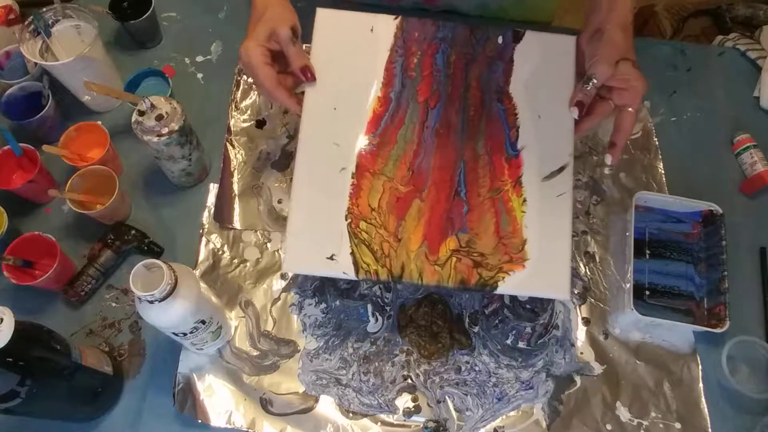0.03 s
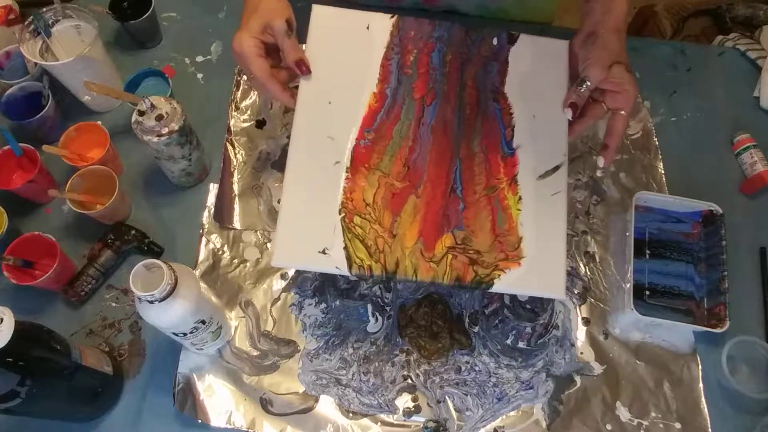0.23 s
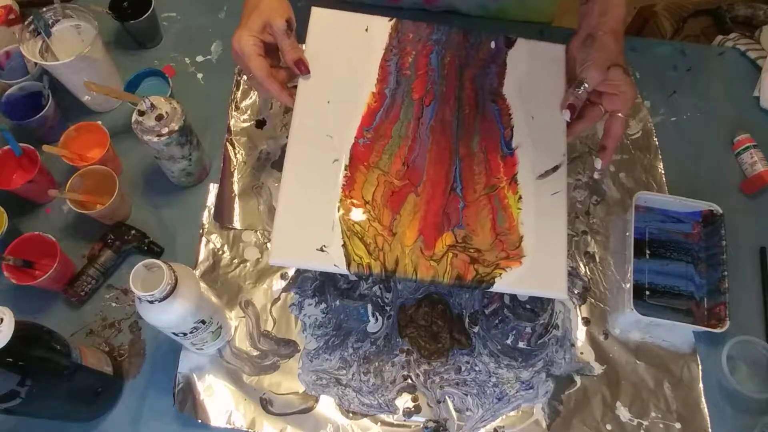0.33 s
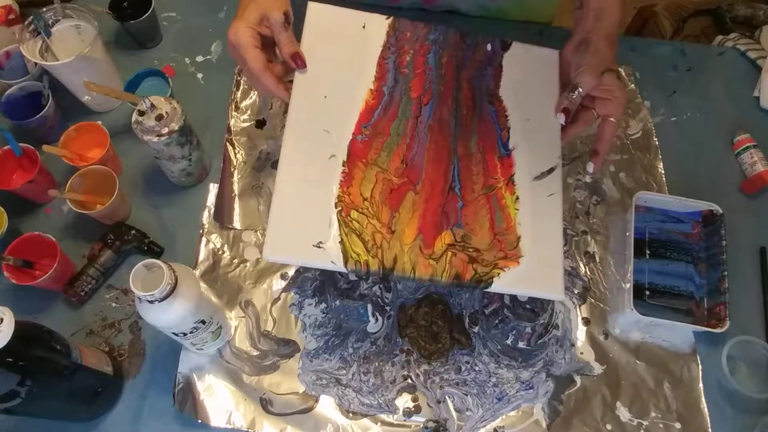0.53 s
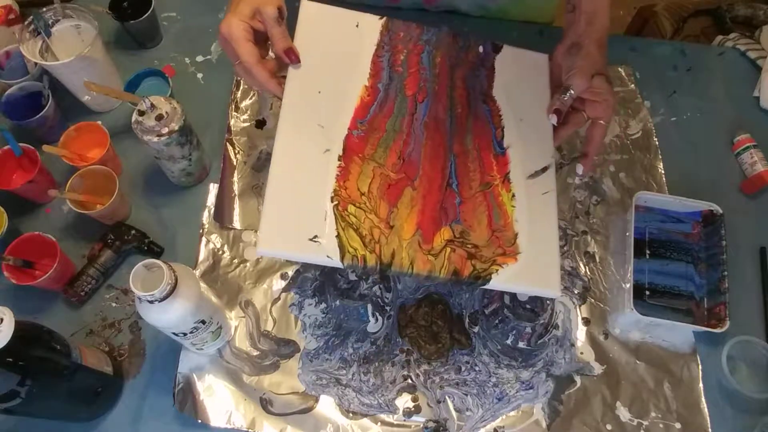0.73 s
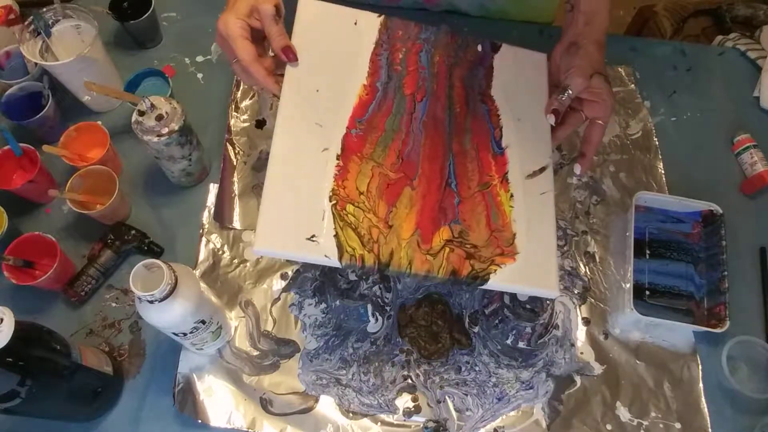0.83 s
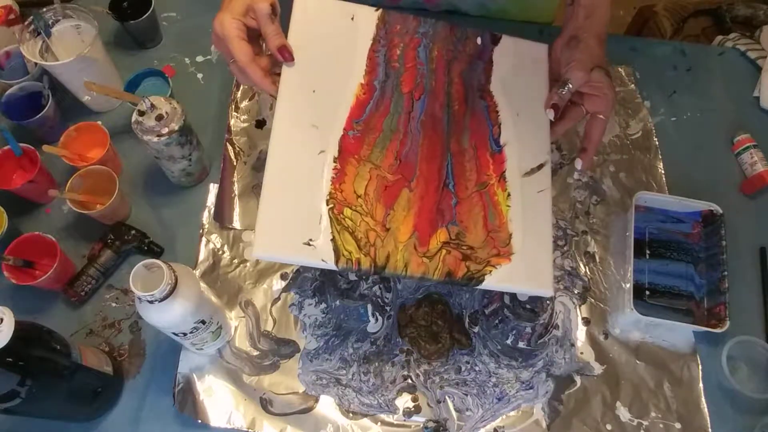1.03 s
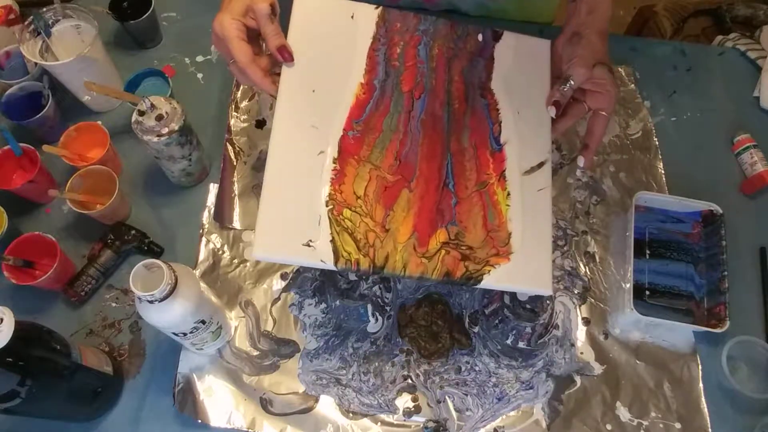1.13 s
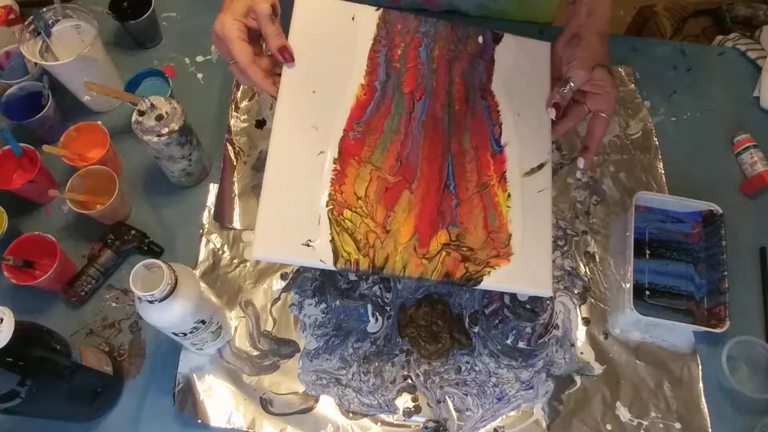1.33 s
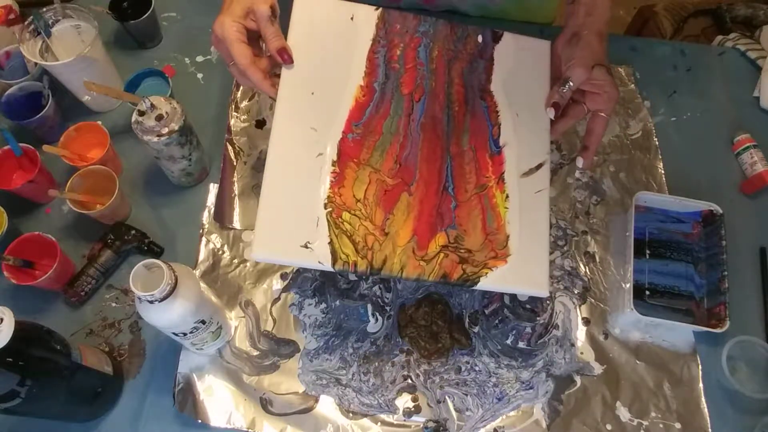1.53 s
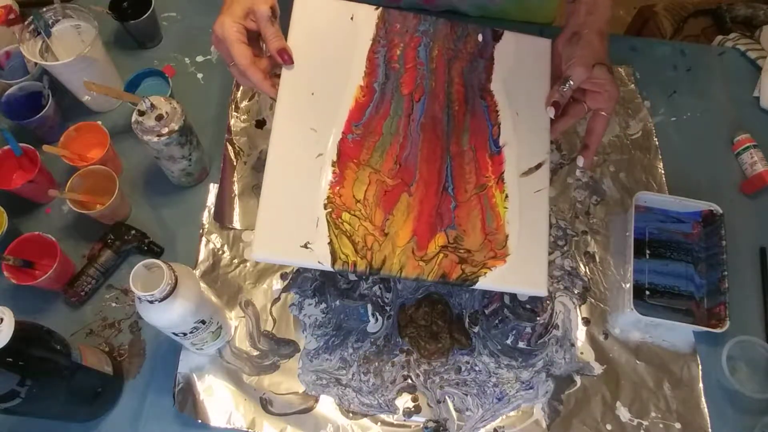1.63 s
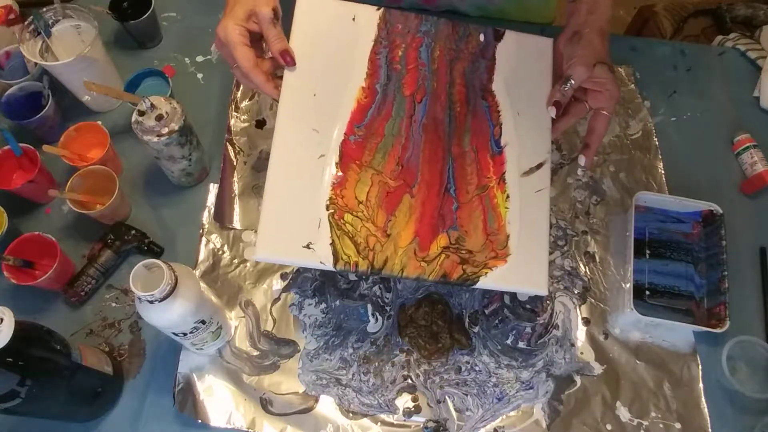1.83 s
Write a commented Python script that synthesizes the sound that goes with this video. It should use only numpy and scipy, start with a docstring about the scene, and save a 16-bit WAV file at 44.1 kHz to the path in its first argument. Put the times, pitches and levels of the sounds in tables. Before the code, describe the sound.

Foil crackling and popping in two bursts under a moved canvas, with soft frame knocks.

```python
"""A stretched canvas is shifted twice on a table covered in aluminium foil, in a small room.
Over dull room tone, the frame knocks softly and the table thuds. First shift, 0.2-0.6 s: the foil
crinkles and buckles in snaps and a pitched pop; the frame knocks and the canvas rings.
A lull, then the second shift, 1.0-1.4 s, with more short pops. Scattered snaps and pops follow.
The microphone has a strong resonance near 9 kHz throughout."""
import sys
import numpy as np
from scipy import signal
from scipy.fft import rfft, irfft
from scipy.io import wavfile
from scipy.ndimage import uniform_filter1d

SR = 44100
rng = np.random.default_rng(int(sys.argv[2]) if len(sys.argv) > 2 else 0)


def output_pcm(signal):
    """Save a mono or channel-first signal as 16-bit PCM at the path in sys.argv[1].

    Samples are clipped to [-1, 1] before scaling.
    """
    pcm = np.clip(np.atleast_2d(signal).T, -1, 1) * 32767
    wavfile.write(sys.argv[1], SR, np.round(pcm).astype(np.int16))


N = 83790
T = np.arange(N) / SR
HZ = np.fft.rfftfreq(2 * N, 1 / SR)

# room tone spectrum: (frequency [Hz], level [dB])
ROOM_TONE = [(20, -93), (40, -54), (65, -40), (100, -45), (135, -35.5), (170, -45), (260, -37.5),
             (420, -36), (700, -42), (1100, -45), (2200, -51.5), (4000, -58.5), (6500, -74), (9000, -72),
             (16000, -65)]
# frame knocks: (time [s], level [dB], centre of excited modes [Hz], spread [octaves])
FRAME_KNOCKS = [(0.138, -55, 413, 0.86), (.21, -32.5, 238, 0.58), (.226, -38, 480, 0.21),
                (.262, -28, 714, 0.15), (0.267, -34, 495, 0.18), (0.33, -29, 220, 0.2),
                (.445, -25, 454, 0.71), (.471, -31, 450, 0.22), (.485, -25.5, 930, 1.06),
                (.523, -36, 430, 0.48), (0.841, -49.5, 490, 0.98), (1.036, -37, 417, 0.37),
                (1.072, -33, 475, 0.35), (1.15, -31.5, 650, 0.57), (1.299, -32.5, 520, 0.6),
                (1.326, -34.5, 590, 0.53), (1.362, -34.5, 603, 0.4), (1.575, -46.5, 402, 0.54)]
# canvas and frame modes: (frequency [Hz], gain [dB], t60 [s])
CANVAS_MODES = [(224.6, -11.5, 0.33), (245, -11, 0.21), (372, -19.5, 0.78), (426, -6, 0.62),
                (447, -4.5, 0.27), (473.9, -1, 0.19), (570, -9, 0.25), (636.7, -10.5, 0.35),
                (659, -4, 0.26), (724, -13, 0.24), (1308, -7.5, 0.36), (1406, 0, 0.31), (1560, -8, 0.45)]
# table bumps: (time [s], pitch [Hz], level [dB])
TABLE_BUMPS = [(0.147, 108, -51), (0.403, 67, -40.5), (.503, 114, -46), (.568, 62, -44), (0.65, 80, -44),
               (1.827, 85, -44.5)]
# foil drag envelope: (time [s], level [dB])
DRAG_ENVELOPE = [(0, -79.5), (.192, -71.5), (.205, -42.5), (.25, -40.5), (.315, -49.5), (.35, -42.5),
                 (.39, -45), (.435, -42.5), (.53, -39.5), (.62, -70), (.74, -71), (.79, -70.5),
                 (.86, -63.5), (1.0, -77), (1.02, -43.5), (1.085, -40), (1.135, -52), (1.255, -59),
                 (1.298, -47.5), (1.306, -40.5), (1.39, -54.5), (1.56, -62.5), (1.69, -69.5), (1.9, -57.5)]
# crinkle spectrum: (frequency [Hz], gain [dB])
CRINKLE_SPECTRUM = [(100, -32), (250, 5.5), (600, 8.5), (1500, 5.5), (3000, 6), (6000, -1.5), (9000, 5),
                    (12000, 0.5), (16000, -4)]
# snap bands, body to top: (frequency [Hz])
SNAP_BANDS_HZ = [480, 1600, 4300, 9100, 13500]
# foil snaps: (time [s], body [dB], middle [dB], presence [dB], treble [dB], top [dB])
FOIL_SNAPS = [(0.2, -29, -30, -25.5, -23, -33), (0.205, -45, -23, -14, -48, -38),
              (0.22, -27, -41, -39, -19, -22), (0.229, -20.5, -17.5, -24, -20, -25),
              (0.249, -21, -32, -43, -19, -52), (0.274, -33, -30, -20.5, -24, -43),
              (0.358, -60, -26, -25.5, -14.5, -17), (0.364, -60, -31, -19.5, -26, -26),
              (0.395, -36, -50, -44, -18, -22), (0.447, -11.5, -8, -24, -48, -44),
              (0.455, -11, -6.5, -40, -17, -28), (0.484, -8.5, 0, -13, -18.5, -27),
              (0.496, -6.5, -3.5, -20.5, -73, -40), (0.526, -26, -12.5, -39, -23, -40),
              (0.556, -20.5, -36, -39, -28, -34), (0.575, -44, -21, -27.5, -27.5, -36),
              (0.606, -24, -53, -35, -29.5, -36), (0.69, -23, -49, -55, -43.5, -48),
              (1.009, -60, -13, -33, -34.5, -38), (1.021, -37, -30, -44, -27, -34),
              (1.058, -37, -19, -31, -27, -42), (1.073, -28, -15.5, -26, -36, -95),
              (1.101, -22.5, -20, -32.5, -36.5, -40), (1.149, -12.5, -24, -42, -29, -37),
              (1.267, -44, -28.5, -26.5, -38.5, -46), (1.284, -45, -13.5, -32, -40, -48),
              (1.302, -18.5, -24, -35, -23, -32), (1.316, -31, -19, -31, -34, -40),
              (1.339, -18, -21.5, -30, -42, -51), (1.451, -22.5, -27, -37, -30, -44),
              (1.499, -28, -37, -49, -36, -43), (1.597, -51, -39, -60, -44.5, -51),
              (1.635, -24.5, -18.5, -32.5, -35.5, -42), (1.842, -26.5, -34, -40.5, -28, -37)]
# room decay: (frequency [Hz], t60 [s])
ROOM_DECAY = [(200, 0.4), (500, 0.42), (1500, 0.35), (4000, 0.36), (9000, 0.27), (16000, 0.31)]
# foil facets popping through: (time [s], pitch [Hz], level [dB], t60 [s])
FACET_POPS = [(0.2, 1504, -40, 0.32), (1.01, 1657, -30, 0.054), (1.067, 1064, -29.5, 0.16),
              (1.269, 2020, -26, 0.039), (1.451, 4290, -35, 0.077), (1.636, 2205, -34.5, 0.086),
              (1.845, 6200, -39, 0.038)]


def amp(db):
    """Decibels to gain."""
    return 10 ** (np.asarray(db) / 20)


def unit_rms(x):
    """Scales to unit rms."""
    return x / np.sqrt(np.mean(x ** 2) + 1e-20)


def lookup(points, hz):
    """Interpolates a table on a log-frequency axis."""
    points_hz, values = np.transpose(points)
    return np.interp(np.log(hz + 1), np.log(points_hz + 1), values)


def filtered(x, gain):
    """Filters x by one gain per bin of HZ."""
    return irfft(rfft(x, 2 * N) * gain)[:N]


def min_phase(gain):
    """Causal response for a gain curve: no pre-ringing."""
    log_gain = np.log(np.maximum(gain, 1e-5))
    mirrored = np.r_[log_gain, log_gain[-2:0:-1]]
    return np.exp(np.conj(signal.hilbert(mirrored)))[:N + 1]


def low_cut(hz):
    """Fourth-order high-pass gain."""
    return 1 / np.sqrt(1 + (hz / (HZ + 1)) ** 8)


def decay(t60_s, t=T):
    """Exponential fall, 60 dB per t60_s."""
    return np.exp(-np.log(1000) * t / t60_s)


def envelope(rise_s, t60_s):
    """Quick rise, exponential decay."""
    return (1 - np.exp(-T / rise_s)) * decay(t60_s)


def add(mix, time_s, sound):
    """Mixes a sound in at time_s."""
    part = mix[round(time_s * SR):]
    part += sound[:len(part)]


def room_tone():
    """Steady, dull background noise."""
    return filtered(rng.standard_normal(N), amp(lookup(ROOM_TONE, HZ)))


def frame_knocks(rise_s=0.0029, vary_db=1.5, detune=0.0064):
    """The frame meets the table; the contact point decides which canvas modes ring."""
    out = np.zeros(N)
    for time_s, level_db, centre_hz, spread_oct in FRAME_KNOCKS:
        for mode_hz, mode_db, t60_s in CANVAS_MODES:
            excitation = np.exp(-(np.log2(mode_hz / centre_hz) / spread_oct) ** 2 / 2)
            gain = excitation * amp(level_db + mode_db + vary_db * rng.standard_normal())
            cycles = mode_hz * (1 + detune * rng.standard_normal()) * T + rng.random()
            add(out, time_s, gain * envelope(rise_s, t60_s) * np.sin(2 * np.pi * cycles))
    return out


def table_bumps():
    """Soft bumps on the table: low, damped thuds."""
    out = np.zeros(N)
    for time_s, hz, level_db in TABLE_BUMPS:
        thud = envelope(rise_s=0.002, t60_s=0.12) * np.sin(2 * np.pi * hz * T)
        add(out, time_s, amp(level_db) * thud)
    return filtered(out, low_cut(hz=50))


def click_cluster(spread_db=1.5, density=0.2):
    """Dense train of tiny, uneven clicks."""
    sizes = amp(spread_db * np.minimum(rng.exponential(1, N), 4))
    return unit_rms(sizes * rng.choice([-1, 1], N) * (rng.random(N) < density))


def foil_crinkle(creases=24, pitch_range_hz=(1875, 13910), ticks_per_s=900, spread_db=2.0, ping_db=-4):
    """Creases give way at random under the dragged canvas; each ticks, rings at its pitch and scatters."""
    out = np.zeros(N)
    t = T[:4096]
    drag = amp(np.interp(T, *np.transpose(DRAG_ENVELOPE)))
    for hz in np.linspace(*pitch_range_hz, creases):
        sizes = amp(spread_db * np.minimum(rng.exponential(1, N), 3))
        triggers = unit_rms(sizes * (rng.random(N) < ticks_per_s / creases / SR))
        scatter = (click_cluster() * envelope(rise_s=0.0009, t60_s=0.045))[:len(t)]
        ping = np.sin(2 * np.pi * hz * t) * decay(t60_s=0.044, t=t)
        tick = scatter / np.linalg.norm(scatter) + amp(ping_db) * ping / np.linalg.norm(ping)
        tick[0] += 0.66  # direct click
        out += signal.oaconvolve(triggers * drag, tick)[:N]
    return filtered(out / np.sqrt(creases), min_phase(amp(lookup(CRINKLE_SPECTRUM, HZ))))


def foil_snaps(crack_db=-5.5, tail_db=-9.5, dip_hz=1014, dip_db=-5.5, dip_width=0.33):
    """A buckle cracks and runs through the foil as clicks, with its own colour and room tail."""
    out = np.zeros(N)
    dip = amp(dip_db * np.exp(-(np.log((HZ + 1) / dip_hz) / dip_width) ** 2 / 2))
    strength = envelope(rise_s=0.0046, t60_s=0.074) + amp(crack_db) * decay(t60_s=0.004)
    for time_s, *bands_db in FOIL_SNAPS:
        burst = click_cluster() * strength + amp(tail_db) * room_tail()
        bands = amp(lookup(list(zip(SNAP_BANDS_HZ, bands_db)), HZ))
        colour = bands * dip * low_cut(hz=270) * facet_ripple()
        add(out, time_s, filtered(burst, min_phase(colour)))
    return out


def room_tail(build_s=0.043):
    """Diffuse reflections; each band decays at its own rate."""
    hz, t, spectrum = signal.stft(rng.standard_normal(N), SR, nperseg=256)
    fade = decay(lookup(ROOM_DECAY, hz)[:, None], t)
    tail = signal.istft(spectrum * fade, SR, nperseg=256)[1][:N]
    return tail * (1 - np.exp(-T / build_s))


def facet_ripple(depth_db=2.2, step_hz=350):
    """Random spectral ripple: each patch of foil favours its own pitches."""
    knots_hz = np.arange(0, SR, step_hz)
    return amp(depth_db * np.interp(HZ, knots_hz, rng.standard_normal(len(knots_hz))))


def facet_pops(rise_s=0.003, jitter_rms=0.045):
    """A larger facet flips and rings briefly; pitch jitter roughens the high ones."""
    out = np.zeros(N)
    for time_s, hz, level_db, t60_s in FACET_POPS:
        jitter = jitter_rms * unit_rms(uniform_filter1d(rng.standard_normal(N), size=40))
        cycles = np.cumsum(hz * (1 + jitter)) / SR
        add(out, time_s, amp(level_db) * envelope(rise_s, t60_s) * np.sin(2 * np.pi * cycles))
    return out


def scene():
    """Mono mix of room, foil, frame and table."""
    mix = room_tone() + foil_snaps() + foil_crinkle() + facet_pops() + frame_knocks() + table_bumps()
    return mix[None]


def record(dry):
    """Microphone treble resonance, then band limit."""
    resonance_hz, q, boost, cutoff_hz = 9133, 10.5, 4.76, 15750
    response = 1 + boost / (1 + 1j * q * (HZ / resonance_hz - resonance_hz / (HZ + 1)))
    low_pass = signal.firwin(511, cutoff_hz, window=("kaiser", 9), fs=SR)
    return signal.oaconvolve(filtered(dry[0], response), low_pass, "same")[None]


dry = scene()
out = record(dry)
output_pcm(out)
```